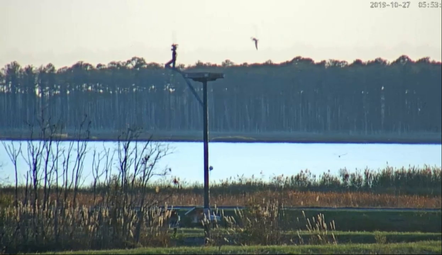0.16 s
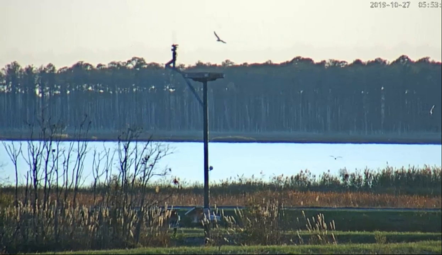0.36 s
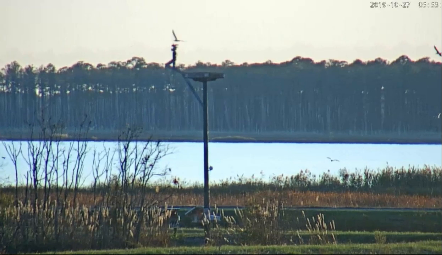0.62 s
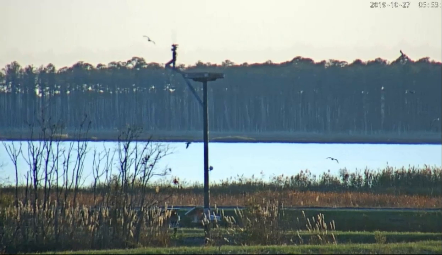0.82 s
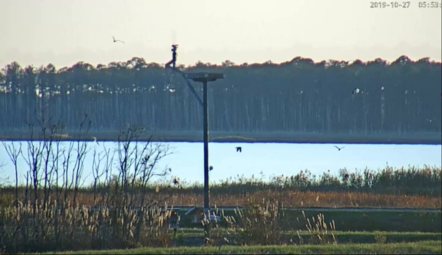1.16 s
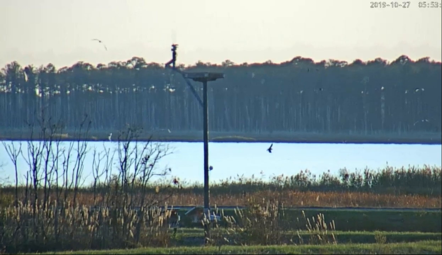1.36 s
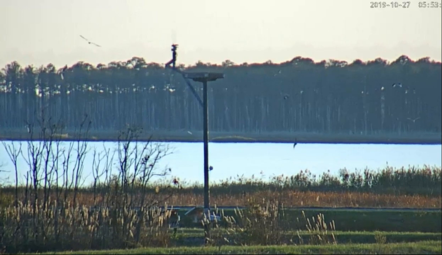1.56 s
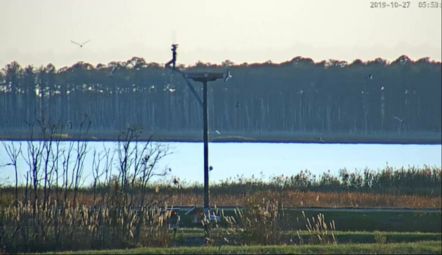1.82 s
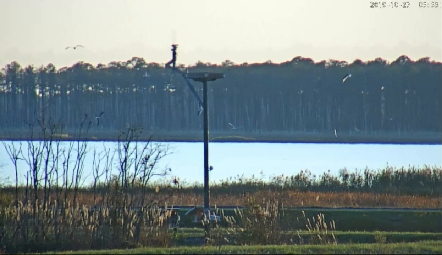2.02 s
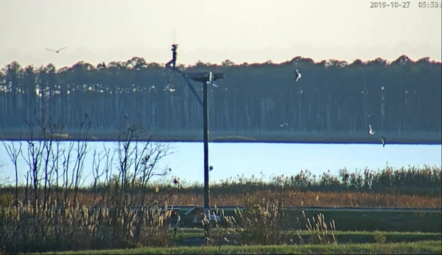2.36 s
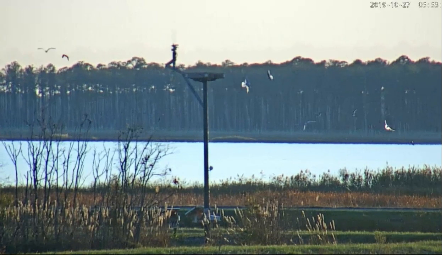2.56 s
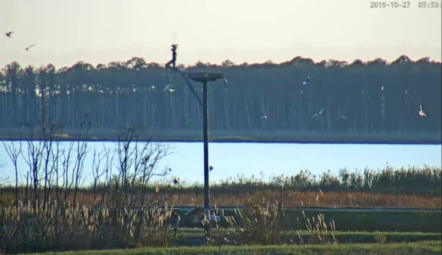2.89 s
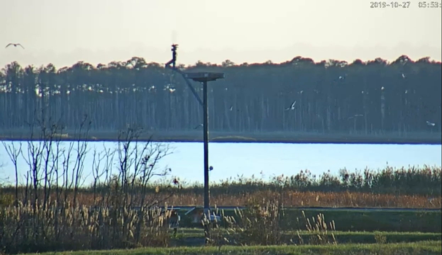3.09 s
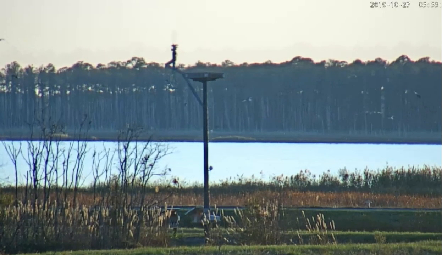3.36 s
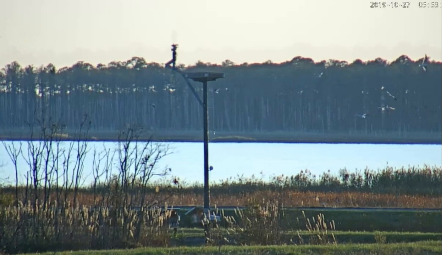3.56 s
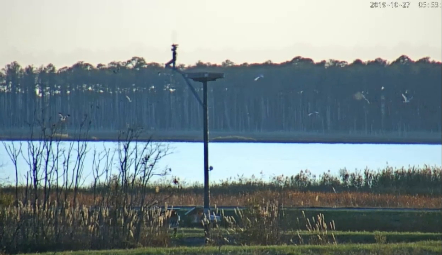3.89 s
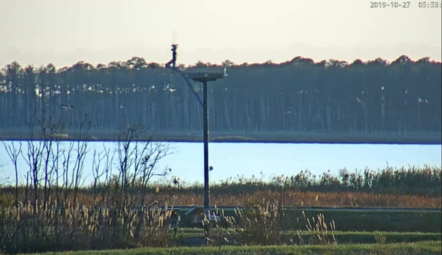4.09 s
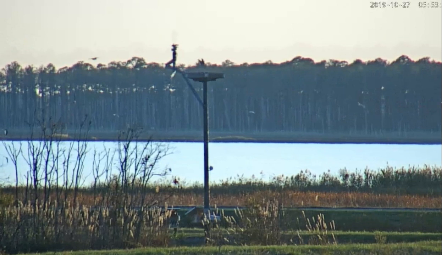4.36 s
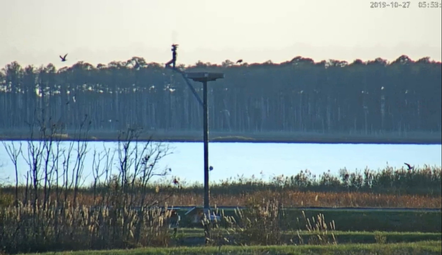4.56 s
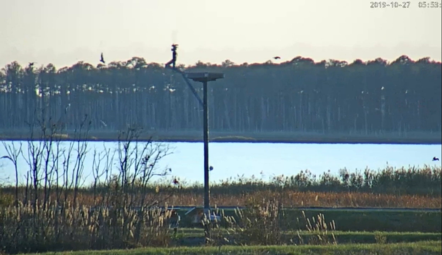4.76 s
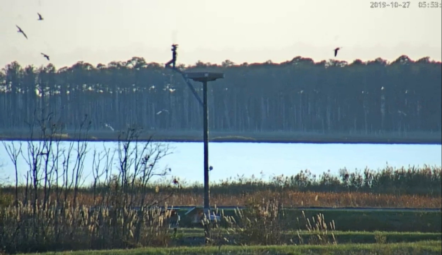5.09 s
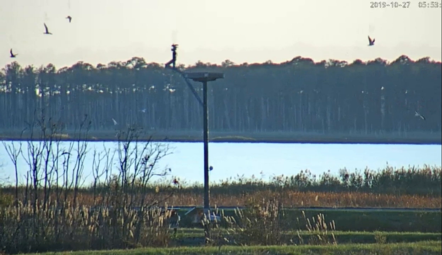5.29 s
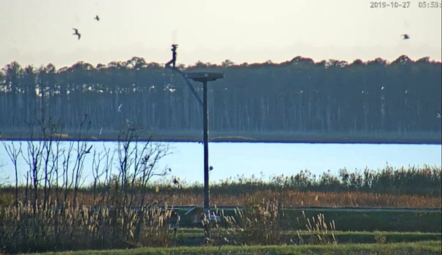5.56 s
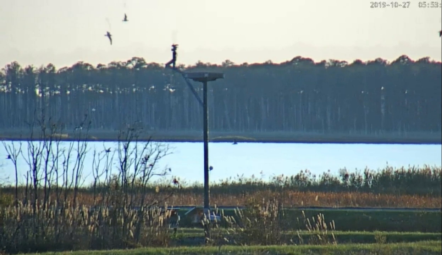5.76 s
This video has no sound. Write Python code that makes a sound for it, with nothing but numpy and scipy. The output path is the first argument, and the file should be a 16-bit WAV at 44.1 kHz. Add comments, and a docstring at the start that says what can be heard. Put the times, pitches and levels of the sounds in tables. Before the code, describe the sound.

Blackbirds give sharp chucks, short whistles and buzzy trills in a marsh, over faint frogs, a distant flock and soft wind pops.

```python
"""Marsh at dawn

Blackbirds sing short whistles that break into buzzy trills, a syrinx tone swept fast through the throat,
and scold with chucks and chatter; reeds and far trees scatter the calls. A flock blurs in the distance,
frogs purr in pulses on one high pitch, and a faint low hum swells once. Gusts pop softly on the mic."""
import sys
import numpy as np
from scipy import signal
from scipy.fft import rfft, irfft
from scipy.io import wavfile

SR = 44100
rng = np.random.default_rng(int(sys.argv[2]) if len(sys.argv) > 2 else 0)


def digitize_waveform(pressure):
    """Quantize a signal to 16-bit integers and store it at the path in sys.argv[1].

    Rows of a 2-D input are taken as channels; values are limited to [-1, 1].
    """
    field = np.atleast_2d(pressure).T
    bounded = np.clip(field, -1, 1)
    quanta = np.round(bounded * 32767).astype(np.int16)
    wavfile.write(sys.argv[1], SR, quanta)


N = 261072

# The nearer frogs, two callers in turn.
# Each row: start and length in seconds, relative level in dB, throat pitch in Hz, pulses per second.
PURRS = [(-.04, 0.2, -52, 1967, 74), (0.373, 0.27, -53.5, 1973, 55), (0.91, 0.23, -52, 1946, 68),
         (1.073, 0.19, -52.5, 1925, 48), (1.362, 0.22, -52, 1957, 56), (1.711, 0.15, -54.5, 1926, 50),
         (1.862, 0.2, -51, 1974, 55), (2.381, 0.23, -51.5, 1937, 58), (2.867, 0.21, -52.5, 1967, 55),
         (3.057, 0.15, -53.5, 1920, 47), (3.365, 0.22, -51.5, 1978, 41), (3.745, 0.114, -55, 1926, 52),
         (3.839, 0.23, -53, 1980, 45), (4.384, 0.21, -49.5, 1983, 56), (4.903, 0.12, -48, 1915, 47),
         (4.989, .17, -49.5, 1990, 56), (5.397, 0.3, -51.5, 1975, 52)]
# How the distant flock and the wind at the mic rise and fall. Each row: time in seconds, level in dB.
FLOCK_LEVEL = [(0.0, -54), (0.55, -58), (1.56, -55), (1.94, -49), (2.66, -55), (3.7, -60), (4.21, -59.5),
               (4.44, -56.5), (4.66, -54), (4.78, -54.5)]
GUST_LEVEL = [(0.0, -61.5), (0.67, -66), (1.6, -62), (2.64, -68.5), (4.14, -64), (4.58, -69), (5.1, -67),
              (5.92, -68)]
# The stronger pops on the mic. Each row: time in seconds, peak in dB, base pitch in Hz.
POPS = [(0.073, -34.5, 395), (0.176, -45.5, 456), (0.33, -51, 396), (0.414, -50, 310), (0.451, -51, 373),
        (0.592, -50, 293), (0.714, -50.5, 327), (1.087, -56, 446), (1.42, -53.5, 441), (1.49, -46.5, 364),
        (1.625, -47.5, 510), (1.713, -52, 403), (1.765, -53, 560), (1.916, -49, 357), (2.15, -57, 350),
        (2.347, -49.5, 334), (2.49, -40.5, 365), (2.635, -49, 345), (2.736, -50, 370), (2.862, -46, 294),
        (2.92, -47, 348), (3.049, -44, 350), (3.256, -55, 415), (3.847, -47, 368), (3.915, -48, 590),
        (4.018, -61, 318), (4.11, -57, 500), (4.399, -53, 344), (4.434, -54, 467), (4.608, -46, 373),
        (4.796, -43.5, 370), (4.972, -46, 352), (5.607, -49, 372)]
# Scolding chucks. Each row: start in seconds, level in dB, top pitch in Hz, length in seconds,
# pulses per second, size of the pitch arch in Hz.
CHUCKS = [(.11, -41.5, 3330, .065, 166, 700), (0.181, -47, 2430, .03, 120, 600),
          (0.259, -25.5, 3460, .014, 76, 300), (0.303, -43.5, 2310, .025, 105, 295),
          (0.359, -40.5, 3595, .035, 120, 890), (0.561, -28.5, 3400, .008, 140, 610),
          (0.567, -22, 3640, .02, 97, 900), (0.587, -31, 3090, .035, 215, 596),
          (0.68, -36.5, 3840, .024, 88, 1205), (.93, -41, 2960, .025, 135, 500),
          (1.553, -32.5, 3827, .033, 83, 1100), (1.69, -45.5, 3820, .08, 140, 900),
          (1.771, -43, 3800, .03, 140, 700), (2.34, -35, 3410, .022, 91, 990),
          (2.524, -33, 2430, .025, 120, 400), (2.83, -26, 2950, .025, 136, 600),
          (2.974, -32, 2840, .025, 220, 800), (3.18, -37, 2940, .025, 130, 700),
          (3.503, -31.5, 3784, .035, 107, 1226), (3.772, -25.5, 2944, .025, 134, 600),
          (3.822, -37.5, 3870, .045, 177, 1020), (3.928, -32.5, 3780, .025, 68, 1215),
          (4.004, -38, 4070, .035, 133, 1105), (4.183, -23.5, 3016, .028, 118, 585),
          (4.394, -47.5, 4050, .035, 144, 1200), (4.58, -31, 3510, .025, 90, 830),
          (4.609, -36.5, 3680, .027, 89, 1320), (4.671, -50, 4030, .025, 84, 1190),
          (4.997, -33.5, 3450, .025, 62, 1176), (5.115, -43, 2310, .03, 130, 300),
          (5.242, -37, 2330, .03, 120, 300), (5.267, -39.5, 2264, .03, 51, 400),
          (5.405, -32, 3510, 0.068, 140, 200), (5.801, -39.5, 2194, .02, 92, 500),
          (5.831, -23.5, 3550, 0.059, 140, 200), (5.894, -35, 2770, .025, 220, 500)]
# Whistled notes. Each row: start and length in seconds, first and last pitch in Hz, peak in dB.
WHISTLES = [(0.47, .06, 2460, 2450, -57.5), (0.563, .06, 1250, 1250, -63.5),
            (1.071, 0.062, 800, 812, -67.5), (1.09, 0.041, 2420, 2370, -58),
            (1.15, 0.066, 1150, 1200, -69.5), (1.693, .1, 3600, 3590, -54),
            (1.974, 0.11, 3080, 3220, -47.5), (2.585, 0.12, 1843, 1780, -44.5),
            (2.612, 0.12, 3025, 2950, -54.5), (2.62, 0.088, 1520, 1474, -58),
            (2.676, 0.056, 1240, 1235, -69), (2.688, 0.01, 2010, 1983, -37),
            (2.706, 0.031, 3360, 3297, -30), (2.71, 0.026, 3730, 3730, -40.5),
            (2.725, 0.036, 5010, 5020, -51), (2.968, 0.052, 895, 874, -67), (3.554, 0.075, 3020, 2940, -47),
            (3.566, .085, 3300, 3300, -51), (4.009, 0.033, 4000, 4030, -48),
            (4.295, 0.047, 3600, 3340, -50.5), (4.53, 0.05, 1550, 1480, -63),
            (4.682, 0.098, 1948, 1874, -48), (4.77, 0.077, 3150, 3320, -55),
            (4.822, 0.062, 3446, 3573, -34), (4.825, 0.04, 3740, 3850, -37.5),
            (4.828, 0.076, 3084, 3230, -34.5), (4.83, 0.037, 4700, 4770, -55.5),
            (4.895, 0.65, 2680, 2664, -51), (5.057, 0.056, 1313, 1225, -63.5),
            (5.093, 0.054, 1430, 1460, -64), (5.25, 0.069, 801, 804, -60), (5.582, 0.056, 1927, 2015, -41),
            (5.654, 0.078, 1120, 1100, -69.5), (5.749, 0.024, 2664, 2640, -37)]
# Thin ticks. Each row: time in seconds, peak in dB, middle pitch in Hz.
TICKS = [(1.272, -58, 2200), (3.383, -48, 2050), (3.631, -54, 1490), (3.751, -54, 3900),
         (4.159, -36.5, 4050), (4.736, -40.5, 1900), (4.78, -45, 2200), (4.92, -40, 1030),
         (4.936, -58, 1300)]
# Trills. Each row: start and length in seconds, relative levels of the voice and of its rasp in dB.
TRILLS = [(2.707, 0.63, -32.5, -59), (3.325, 0.29, -46, -74), (4.86, 0.595, -35.5, -65.5)]
# Chattered notes. Each row: start in seconds, relative level in dB.
CHATTER = [(5.335, -21), (5.4158, -18), (5.504, -19), (5.5932, -19.5), (5.673, -18.5), (5.765, -18),
           (5.86, -17.5)]
# Tone colours as heard at the mic. Each row: frequency in Hz, relative level in dB.
FLOCK_COLOUR = [(2300, -29), (2560, -10.5), (2720, 5.5), (2900, -0.5), (3080, 6), (3300, -4), (3550, 1),
                (3800, 2), (4000, -8), (4300, -9.5), (4800, -34)]
RUMBLE_COLOUR = [(35, -66), (60, -50.5), (255, -4), (368, 0.5), (582, -4), (702, -10.5), (1000, -16),
                 (1300, -41), (2200, -120)]
AIR_COLOUR = [(410, -29.5), (700, -10.5), (856, -18.5), (1330, -33), (1880, 1.5), (2230, -9), (2810, -5.5),
              (3680, -3), (4590, -9.5), (5560, -12), (6940, -24.5), (7750, -39.5), (10100, -76),
              (17000, -120)]
THROAT_COLOUR = [(1350, -42.5), (2300, -8), (2450, -18.5), (2610, -3), (2770, -1.5), (3060, -2), (3330, -3),
                 (3520, -1.5), (3660, -4), (3900, -1.5), (4300, -13.5), (4800, -17.5), (5300, -31.5),
                 (6760, -67), (11400, -120)]
RASP_COLOUR = [(3900, -31), (4300, 3.5), (4900, -6.5), (5500, -18.5)]
CHATTER_COLOUR = [(1590, -49), (2700, -19), (3080, -4), (3600, -10.5), (4030, -3.5), (4310, -16),
                  (4560, -16), (5400, -34.5), (7020, -73.5), (11900, -120)]

MARSH_T60_S, MARSH_ECHO_DB = .22, -4
FAR_FROGS_HZ, FAR_FROGS_T60_S, FAR_FROGS_DB = 1811, .019, -63.5
POP_CYCLES, FAINT_POP_DB, AIR_DB = 3.05, -57, -55
CHUCK_LOUDEST, CHUCK_FADE = .46, 26.5   # loudest point of a call (0-1), steepness of the fade around it
ECHO_FOLLOWS, CHUCK_ECHO_DB = .59, -22   # echoes follow only a share of the level: far calls are wetter
TRILL_HZ, TRILL_SWING_HZ, TRILL_ROUGH = 3317, 608, .47


def from_db(db):
    """Gain of a level in dB."""
    return 10 ** (np.asarray(db) / 20)


def rms_one(x):
    """Scale to rms 1."""
    return x / np.sqrt(np.mean(x ** 2) + 1e-20)


def in_time(rows):
    """A (seconds, value) curve, one value a sample."""
    return np.interp(np.arange(N) / SR, *np.transpose(rows))


def drift(hz):
    """Random wander: low-passed noise, rms 1."""
    r = np.exp(-2 * np.pi * hz / SR)
    return rms_one(signal.lfilter([1], [1, -2 * r, r * r], rng.standard_normal(N + SR))[SR:])


def coloured(x, spectrum):
    """Filter by a (Hz, dB) spectrum; rms 1."""
    hz, level = np.transpose(spectrum)
    grid = np.log(np.fft.rfftfreq(N, 1 / SR) + 1)
    return rms_one(irfft(rfft(x) * from_db(np.interp(grid, np.log(hz), level, -90, -90)), N))


def add(out, s, sound):
    """Mix a sound in at s seconds."""
    i = max(round(s * SR), 0)
    out[i:i + len(sound)] += sound[:max(N - i, 0)]


def gate(s, length, attack_s, release_s):
    """One attack, hold and release, silent elsewhere."""
    t = np.arange(N) / SR - s
    return np.clip(np.minimum(t / attack_s, (length - t) / release_s), 0, 1)


def sine(hz):
    """A tone that follows a pitch curve."""
    return np.sin(2 * np.pi * np.cumsum(hz) / SR)


def note(length, first_hz, last_hz, sharp=.55):
    """A gliding sine under a rounded envelope."""
    u = np.linspace(0, 1, max(round(length * SR), 8))
    return np.sin(np.pi * u) ** sharp * sine(first_hz + (last_hz - first_hz) * u)


def warble(centre_hz, swing_hz, per_s, rough):
    """A syrinx tone swept rapidly up and down at an uneven pace; rms 1."""
    turn = 2 * np.pi * np.cumsum(per_s * from_db(5 * rough * drift(80))) / SR
    hz = centre_hz + swing_hz * (np.sin(turn) + .22 * rough * drift(146.6))
    pulse = (1 + .56 * np.cos(turn)) * from_db(rough * drift(120))
    return rms_one(pulse * sine(hz))


def echoes(x):
    """Reeds and far trees scatter each call into a short tail."""
    t = np.arange(SR // 2) / SR
    tail = rng.standard_normal(len(t)) * from_db(-60 * t / MARSH_T60_S) * np.clip(t / .006, 0, 1)
    return signal.fftconvolve(x, tail / np.linalg.norm(tail))[:N]


def across_marsh(x):
    """A call reaches the mic with its echoes."""
    return x + from_db(MARSH_ECHO_DB) * echoes(x)


def frogs():
    """Nearer frogs pulse on a throat pitch, over the narrow-band blur of farther ones."""
    t, near = np.arange(N) / SR, np.zeros(N)
    waver_hz = 10.5 * drift(5) + 25 * drift(61)
    for s, length, db, hz, per_s in PURRS:
        pulses = np.abs(np.sin(np.pi * per_s * (t - s))) ** 4.5
        purr = rms_one(pulses * sine(hz + waver_hz))
        near += from_db(db) * gate(s, length, attack_s=.021, release_s=.045) * purr
    r, w = from_db(-60 / (FAR_FROGS_T60_S * SR)), 2 * np.pi * FAR_FROGS_HZ / SR
    far = rms_one(signal.lfilter([1], [1, -2 * r * np.cos(w), r * r], rng.standard_normal(N)))
    return from_db(2.2 * drift(30) - 2.5) * near + from_db(FAR_FROGS_DB + 4.5 * drift(3.5)) * far


def flock():
    """Many birds far off: trills and hundreds of short notes a second melt into a hiss."""
    notes = np.zeros(N)
    for when, length, pitch, glide, size in rng.random((2400, 5)):
        hz = 2300 + 2200 * pitch
        chirp = note(.006 + .07 * length ** 2, hz, hz + 120 * (glide - .5))
        add(notes, when * N / SR, from_db(9 * size) * chirp)
    far_trills = across_marsh(warble(3270, 560, per_s=175, rough=.11))
    blur = coloured(rng.standard_normal(N), FLOCK_COLOUR)
    mix = rms_one(coloured(notes, FLOCK_COLOUR) + .75 * blur + .45 * far_trills)
    return from_db(in_time(FLOCK_LEVEL) + 3.6 * drift(6.4)) * mix


def air():
    """The steady hiss of open air."""
    return from_db(AIR_DB) * coloured(rng.standard_normal(N), AIR_COLOUR)


def wind_on_mic():
    """Gusts pop on the microphone, each pop in a clump of rumble; faint ones fall at random."""
    pops, clumps = np.zeros(N), from_db(in_time(GUST_LEVEL) - 2.5)
    faint = [(when * N / SR, FAINT_POP_DB + 6 * (size - .5), 280 + 200 * pitch)
             for when, size, pitch in rng.random((36, 3))]
    for s, peak_db, hz in POPS + faint:
        add(pops, s - .002, from_db(peak_db) * note(POP_CYCLES / hz, hz * 1.135, hz * 1.05, sharp=2.64))
        add(clumps, s - .008, from_db(.57 * peak_db - 36) * np.hanning(round(.032 * SR)))
    lumps = from_db(1.3 * drift(6.8) + 2.3 * drift(59))
    return pops + clumps * coloured(lumps * rng.standard_normal(N), RUMBLE_COLOUR)


def chucks():
    """Scolding near and far, with echoes: each pulse arches in pitch over a steadier low voice."""
    direct, send = np.zeros(N), np.zeros(N)
    luck = rng.standard_normal((len(CHUCKS), 16, 3))
    grit = drift(450)
    for (s, db, hz, length, per_s, arch_hz), draws in zip(CHUCKS, luck):
        count = int(np.clip(round(length * per_s), 1, 16))
        u = np.linspace(0, 1, round(.75 * SR / per_s))
        swell = np.sin(np.pi * u) ** 1.2
        width = arch_hz / 1200   # wide arches are rougher, with more low voice
        for k, (pitch_luck, level_luck, shape_luck) in enumerate(draws[:count]):
            start, late = s + k / per_s, (k + .5) / count
            crest = np.clip(.6 - .3 * late + .06 * shape_luck, 0, 1)   # where the pitch tops out
            high_hz = hz + arch_hz * (.13 * pitch_luck - .4 * late ** 2 - 2 * (u - crest) ** 2)
            low_hz = hz - arch_hz * (.654 + .25 * u + .059 * shape_luck)
            voices = sine(high_hz) + width ** 3 * sine(low_hz)
            voices *= 1 + .3 * width * np.resize(grit[round(start * SR):], len(u))
            pulse = from_db(.5 * level_luck - CHUCK_FADE * (late - CHUCK_LOUDEST) ** 2) * swell * voices
            add(direct, start - .001, from_db(db) * pulse)
            add(send, start - .001, from_db(ECHO_FOLLOWS * db + CHUCK_ECHO_DB) * pulse)
    return direct + echoes(send)


def whistles():
    """Clear blackbird notes with flat tops and a slight flutter."""
    out = np.zeros(N)
    for s, length, first_hz, last_hz, peak_db in WHISTLES:
        add(out, s, from_db(peak_db) * note(length, first_hz, last_hz, sharp=.37))
    return out * from_db(2.2 * drift(45))


def ticks():
    """Falling blips of about two cycles."""
    out = np.zeros(N)
    for s, peak_db, hz in TICKS:
        add(out, s - .001, from_db(peak_db) * note(2.1 / hz, hz * 1.5, hz * .58))
    return out


def trills():
    """Each side of the syrinx warbles at its own speed through one throat; a rasp rides on top."""
    gates = [gate(s, length, attack_s=.035, release_s=.028) for s, length, *_ in TRILLS]
    voice_gain, rasp_gain = from_db([row[2:] for row in TRILLS]).T @ gates
    slow_side = warble(TRILL_HZ + 70 * drift(12), TRILL_SWING_HZ, per_s=171, rough=.3 * TRILL_ROUGH)
    fast_side = warble(TRILL_HZ, .83 * TRILL_SWING_HZ, per_s=323, rough=TRILL_ROUGH)
    breath = .6 * rng.standard_normal(N)
    voice = from_db(-2.5) * coloured(slow_side + 1.78 * fast_side + breath, THROAT_COLOUR)
    rasp = coloured(from_db(2.5 * drift(150)) * rng.standard_normal(N), RASP_COLOUR)
    return from_db(1.5 * drift(35)) * (voice_gain * voice + rasp_gain * rasp)


def hum(start_s=3.15, length_s=.62, db=-67, hz=690, width_hz=25):
    """A faint hum: noise in a narrow resonance, swelling and fading."""
    r, w = np.exp(-np.pi * width_hz / SR), 2 * np.pi * hz / SR
    ring = signal.lfilter([1, 0, -1], [1, -2 * r * np.cos(w), r * r], rng.standard_normal(N))
    return from_db(db) * gate(start_s, length_s, attack_s=.12, release_s=.12) * rms_one(ring)


def chatter():
    """Loud scolding: each note starts with three loose, lower squeaks, then buzzes and dies."""
    voices = warble(3900, 913, per_s=145, rough=.45) + 1.5 * warble(3480, 160, per_s=145, rough=.45)
    buzz = coloured(voices + .8 * rng.standard_normal(N), CHATTER_COLOUR)
    out, t = np.zeros(N), np.arange(round(.07 * SR)) / SR
    attack = np.clip(t / .013, 0, 1)
    shape = attack * np.clip((.07 - t) / .087, 0, 1) ** 1.49
    for (s, db), luck in zip(CHATTER, rng.standard_normal((len(CHATTER), 6))):
        lead_in = note(.031, 2560 + 90 * luck[5], 2430 + 70 * luck[0])
        squeak = note(.012, 2100, 2200 + 90 * luck[2])
        scoop = note(.012, 2300, 3200)
        add(out, s - .038 + .0055 * luck[3], from_db(db - 25 + .6 * luck[4]) * lead_in)
        add(out, s - .02 + .0014 * luck[0], from_db(db - 25.5 + 1.9 * luck[1]) * squeak)
        add(out, s - .012, from_db(db - 26 + 3 * luck[2]) * scoop)
        i = round(s * SR)
        add(out, s, from_db(db - 8.5) * shape[:N - i] * buzz[i:i + len(t)])
    return out


def scene():
    """One microphone in the marsh: animals out in the open, wind right on the capsule."""
    birds = across_marsh(trills() + whistles() + chatter() + ticks()) + chucks()
    return (birds + frogs() + flock() + hum() + wind_on_mic() + air())[None]


def record(dry):
    """The recorder: bass cut, steep top cut, faint converter hiss."""
    x = signal.sosfilt(signal.butter(4, 130, "high", fs=SR, output="sos"), dry)
    x = signal.sosfilt(signal.cheby2(16, 50, 8000, fs=SR, output="sos"), x)
    return x + from_db(-99) * rng.standard_normal(x.shape)


dry = scene()
out = record(dry)
digitize_waveform(out)
```